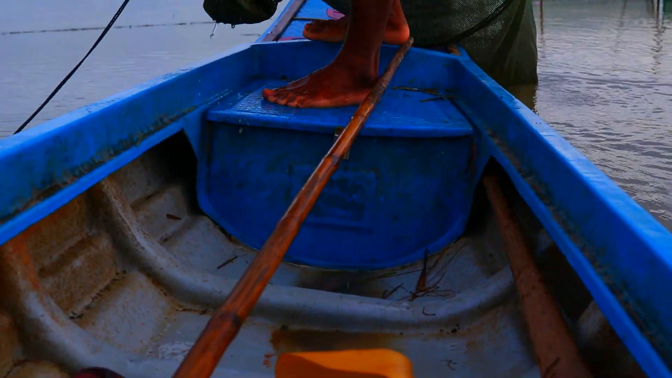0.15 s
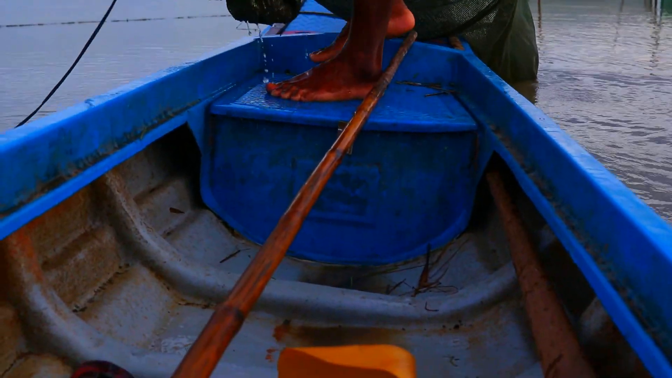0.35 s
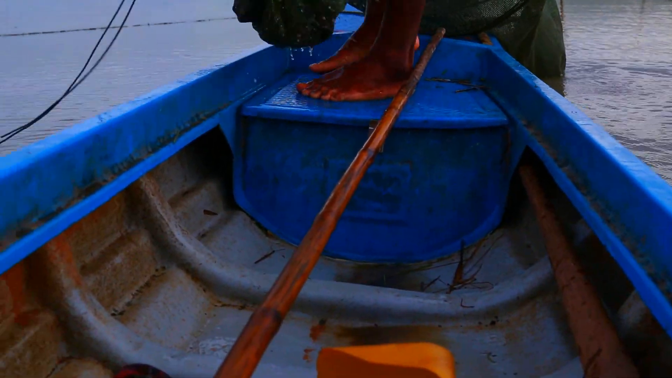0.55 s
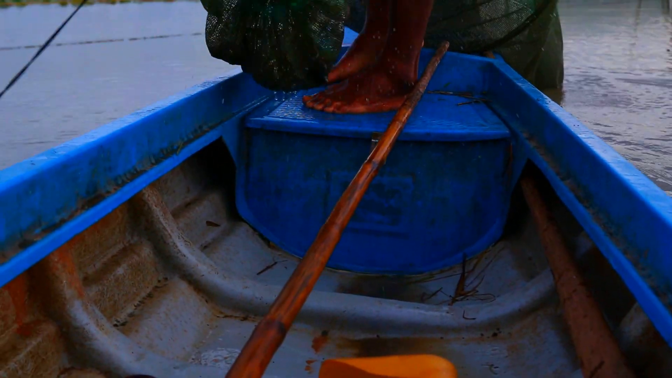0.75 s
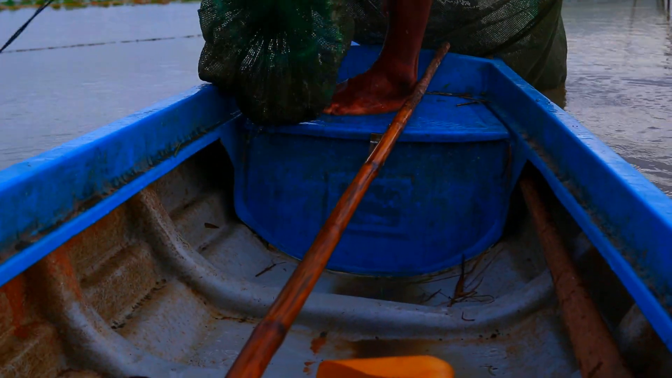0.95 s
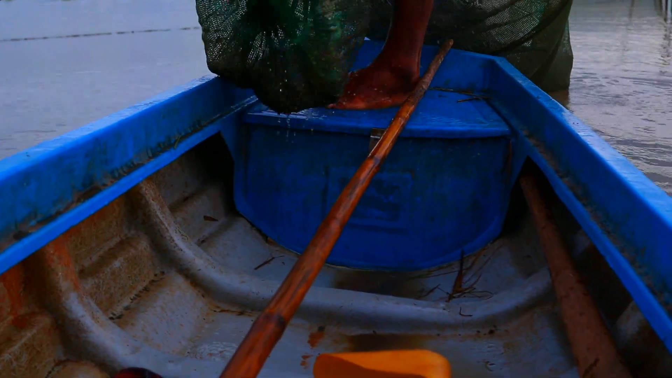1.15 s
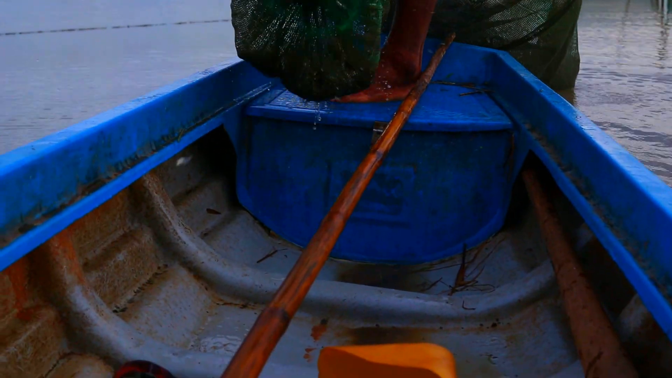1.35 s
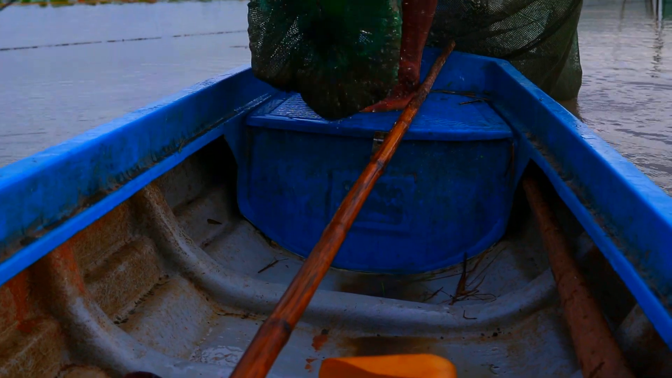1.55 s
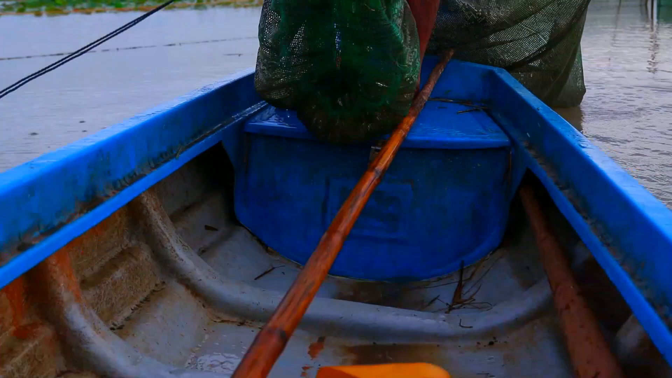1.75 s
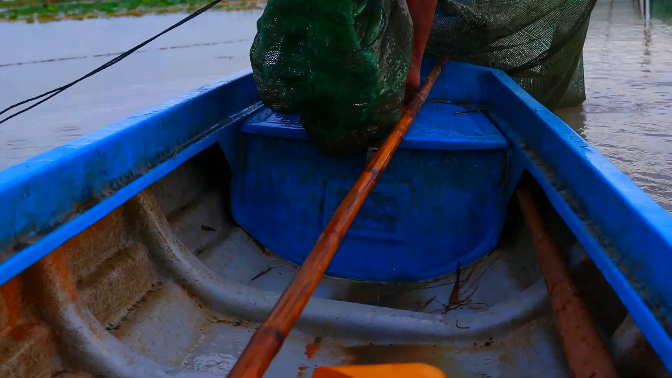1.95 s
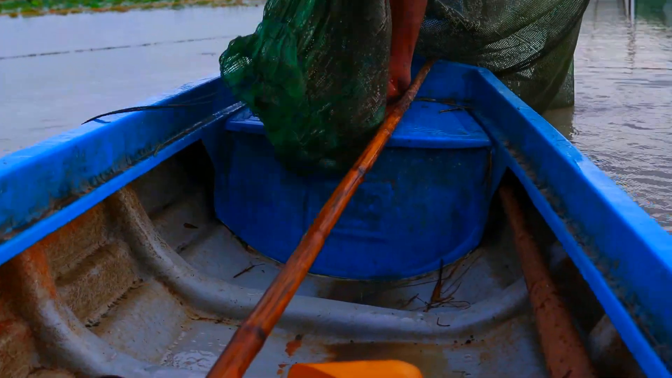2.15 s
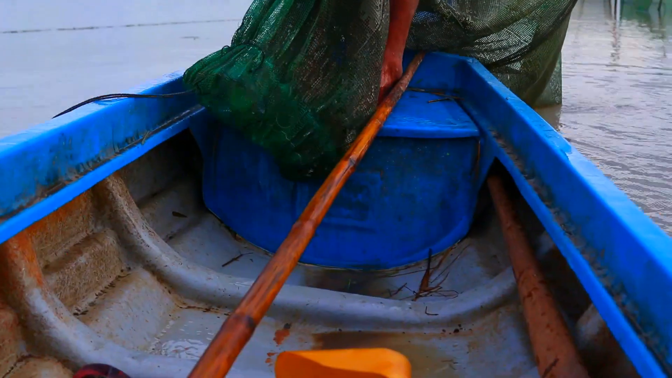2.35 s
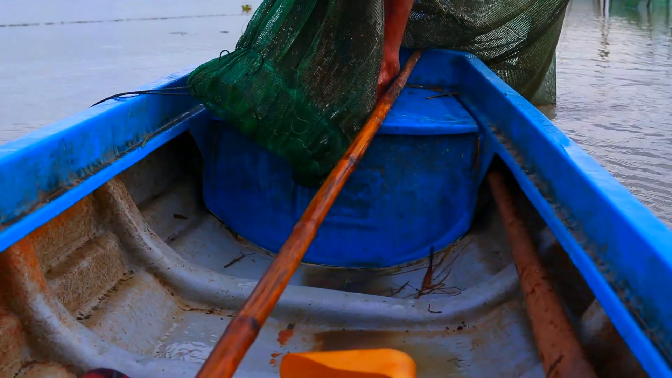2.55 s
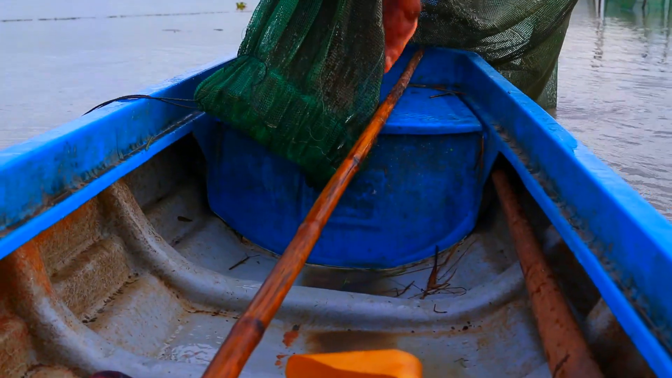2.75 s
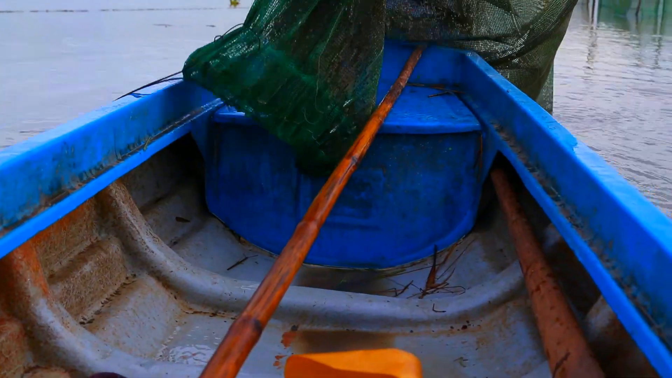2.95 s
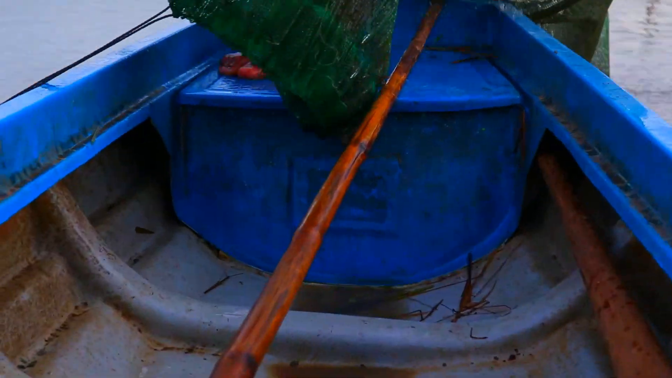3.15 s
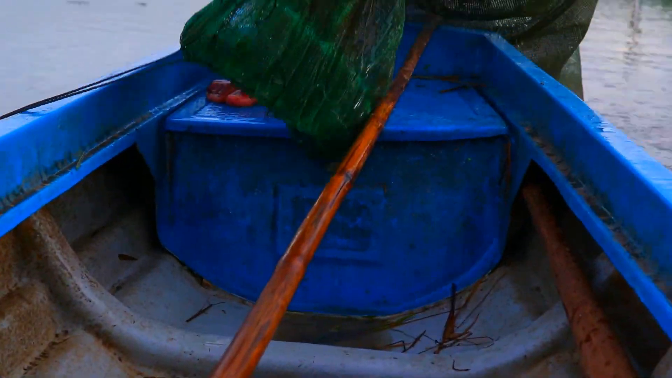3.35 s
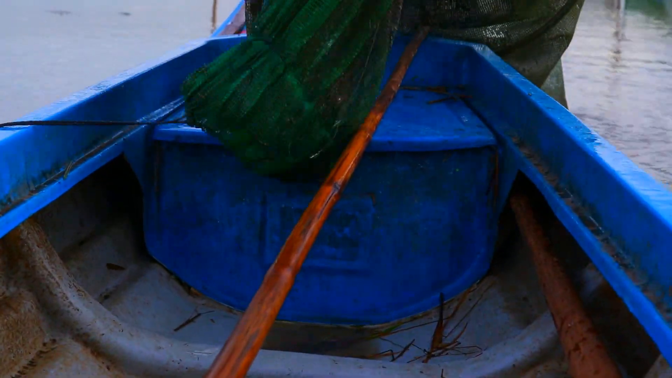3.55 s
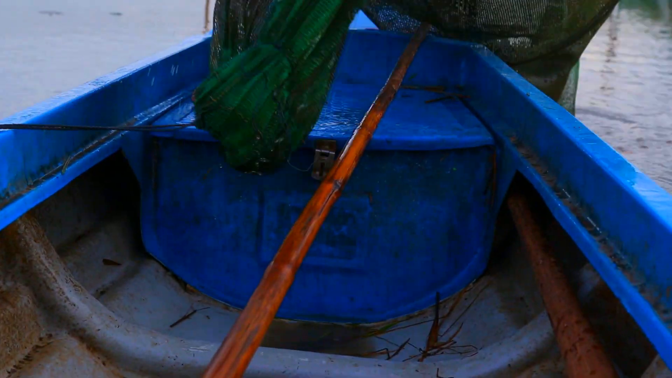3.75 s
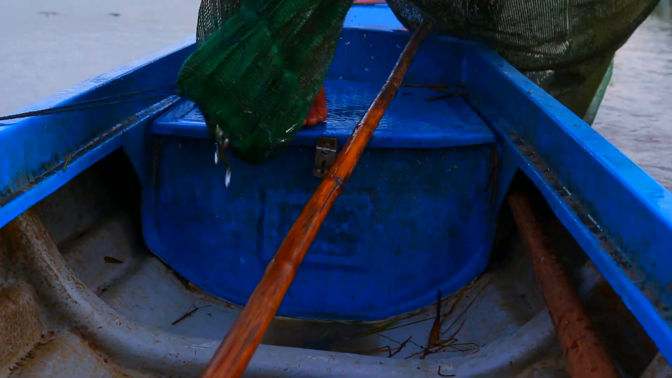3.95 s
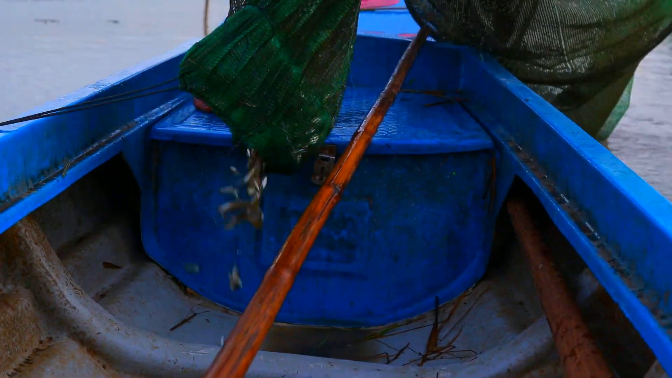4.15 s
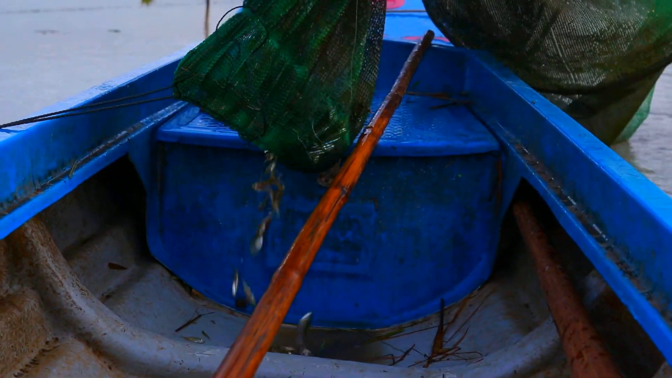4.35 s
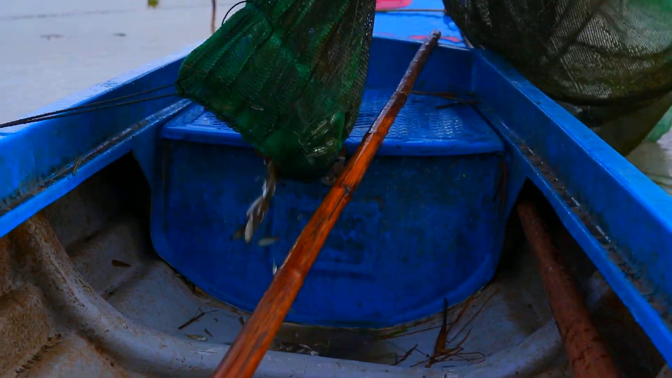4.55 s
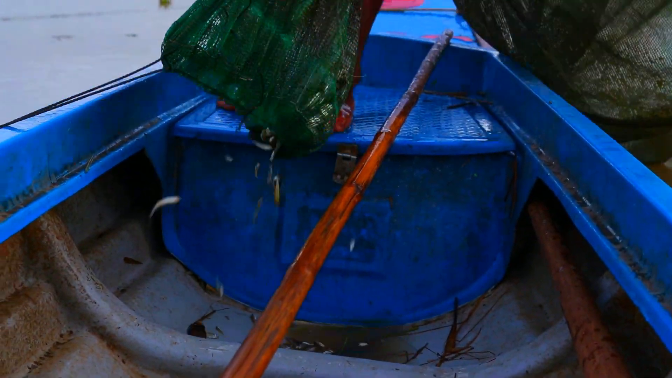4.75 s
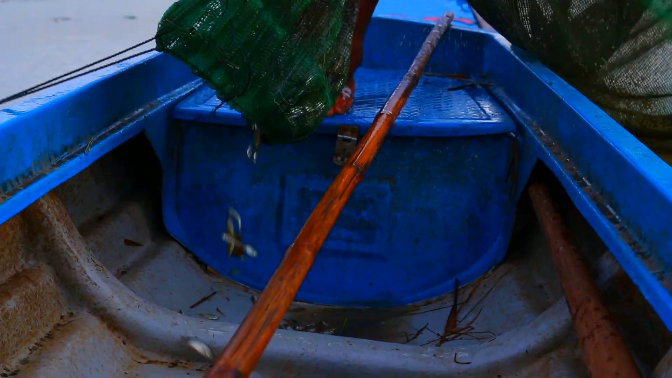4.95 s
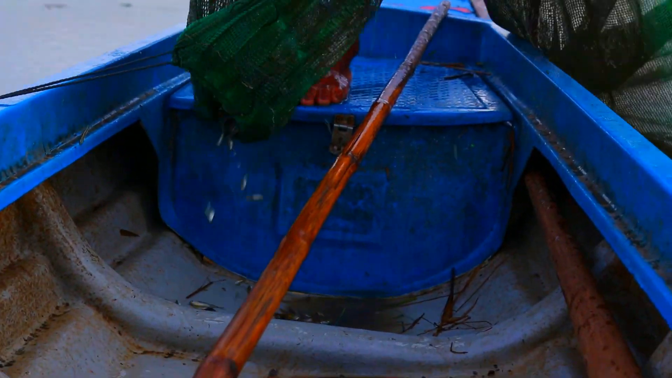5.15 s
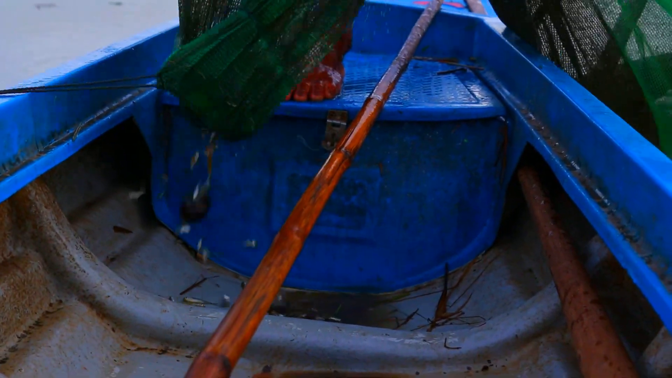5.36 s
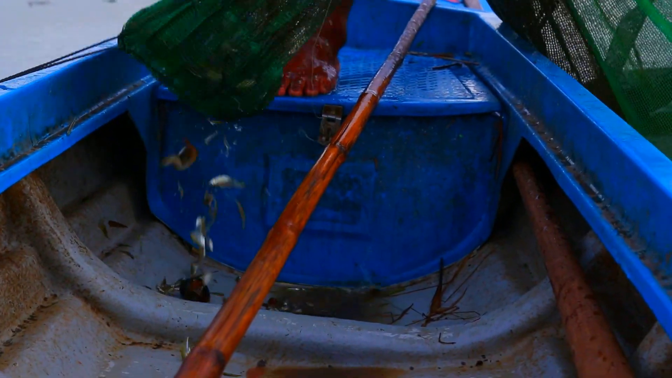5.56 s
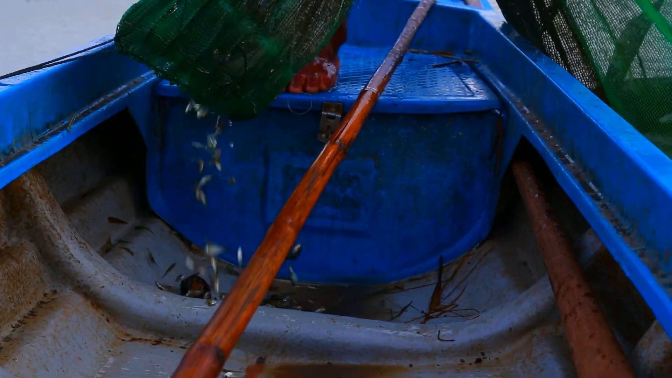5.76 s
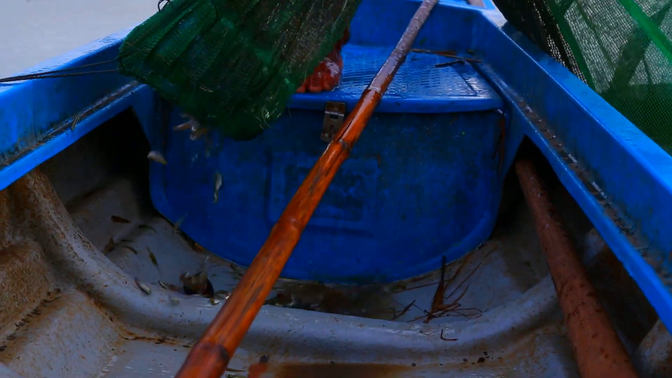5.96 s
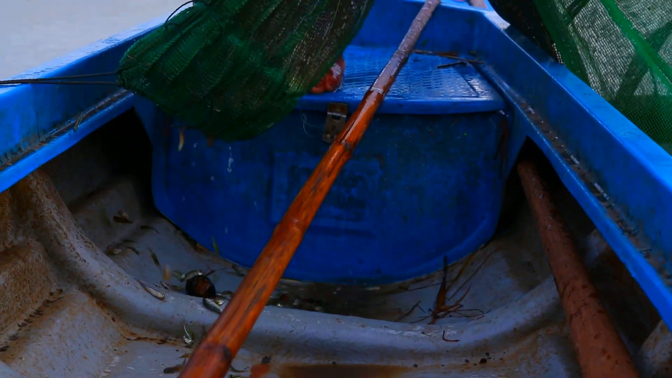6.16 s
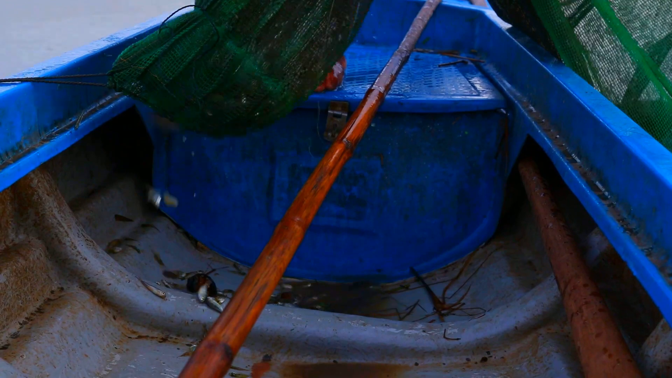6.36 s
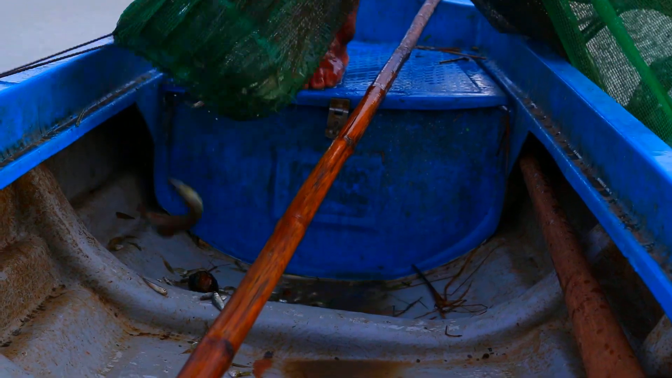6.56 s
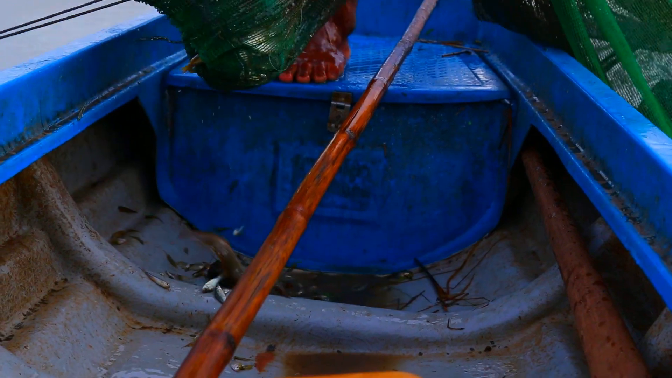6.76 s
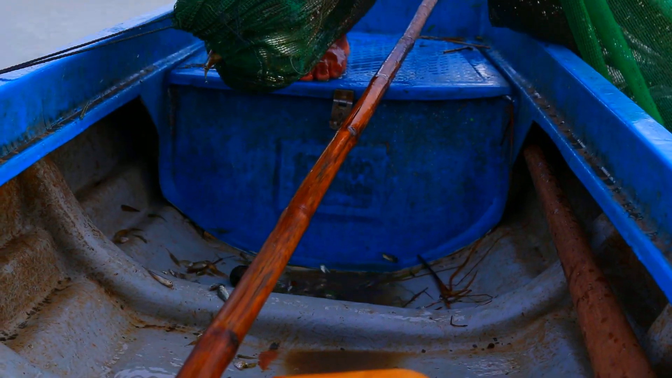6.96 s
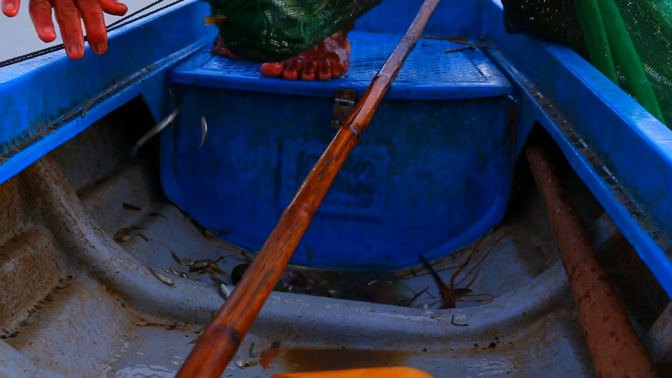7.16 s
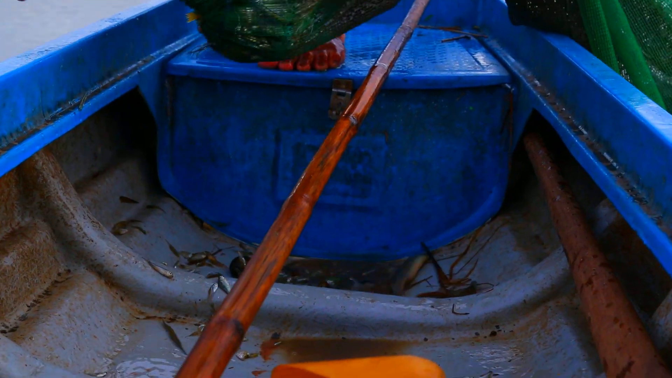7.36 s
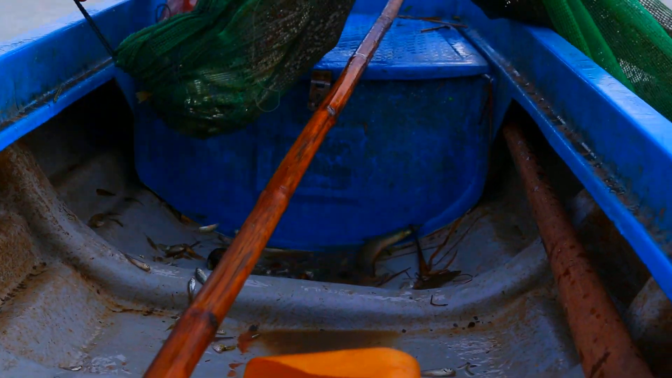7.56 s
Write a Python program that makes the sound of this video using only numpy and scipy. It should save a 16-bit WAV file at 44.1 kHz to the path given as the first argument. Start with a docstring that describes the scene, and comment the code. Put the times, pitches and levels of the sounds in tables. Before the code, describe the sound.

Outdoors on calm water, heard close up in a small hollow plastic boat, over a very faint far rumble, water hiss and a brief thin insect buzz early on. At first a wet net drips quietly; around 0.5-0.9 s it swishes in with small knocks and a cluster of plinking drops. A sharper knock and spray come near 1.4 s, lighter taps and rustles around 2-2.9 s. From 3.0 to 3.8 s the mesh scrapes over the deck edge in short strokes. From 4 s shaking brings rustling bursts, trickles and flung drops, with a crisp knock at 4.5 s. The loudest hollow clacks land at about 4.85, 5.1, 5.5 and 5.65 s, the last in a tight flurry with wet spray. After 6 s only small taps, soft rustles and drips remain, while a distant bird repeats a falling whistle from 6.5 to 7.4 s.

```python
"""A small plastic boat on open water: a wet net bag is swung in and shaken empty. Shells and small fish knock
and splat on the hull (noise contacts ringing wall and panel modes), the mesh rustles, sheds water (shaped noise
and bubble grains) and drags over the deck edge, and drops plink into puddles (decaying tones). Behind lie a far
rumble, water hiss and an insect (coloured noise) and two birds (gliding sines)."""
import sys
import numpy as np
from scipy import signal
from scipy.fft import rfft, irfft, next_fast_len
from scipy.io import wavfile
from scipy.ndimage import uniform_filter1d, map_coordinates

SR = 44100
rng = np.random.default_rng(int(sys.argv[2]) if len(sys.argv) > 2 else 0)


def master_out(mix):
    """Clip the mix to full scale and print it as 16-bit PCM to the path in sys.argv[1]."""
    frames = np.transpose(np.atleast_2d(mix))
    ceiling = np.clip(frames, -1, 1)
    pcm = np.round(ceiling * 32767).astype(np.int16)
    wavfile.write(sys.argv[1], SR, pcm)


N = 335601

# spectrum of splash and spray, relative: (frequency [Hz], density [dB per Hz])
SPLASH_SPECTRUM = [(2710, -5.5), (4600, -8.5), (5970, -3), (8530, -4), (10100, -5.5), (15000, -15.5),
                   (16400, -57)]
# left-right likeness of wide sounds: (frequency [Hz], correlation [-1..1])
WIDE_LIKENESS = [(25, 0.78), (70, 0.99), (180, 0.96), (550, 0.62), (1650, 0.06), (5000, 0.01)]
# hull wall modes that clack, before stretch and dulling: (frequency [Hz], level [dB], t60 [s])
WALL_MODES = [(710, 0, 0.11), (853, -1.5, 0.23), (1021, 0, 0.22), (1124, 0, 0.18), (1157, -15, 0.086),
              (1414, 2.5, 0.12), (1646, -10, 0.16), (1965, -1, 0.075), (2056, -7, 0.14), (2190, 4, 0.086),
              (2360, 1, 0.11), (2630, 10, 0.063), (2790, -3.5, 0.17), (3310, -8, 0.17), (3156, 9.5, 0.032),
              (3540, 0, 0.12), (4460, 11, 0.015)]


def amp(db):
    """Decibels to amplitude."""
    return 10 ** (np.asarray(db) / 20)


def unit(x):
    """x scaled to rms 1."""
    return x / np.sqrt(np.mean(x ** 2) + 1e-20)


def along(points, hz):
    """Interpolate (Hz, value) points on a log frequency axis."""
    f, v = np.transpose(points)
    return np.interp(np.log(hz + 1), np.log(f + 1), v)


def curves(rows):
    """One value per sample for each column after the time."""
    s, *cols = np.transpose(rows)
    return [np.interp(np.arange(N) / SR, s, c) for c in cols]


def wobble(knots_per_s):
    """A smooth random curve through normally distributed knots."""
    knots = rng.standard_normal(int(N * knots_per_s / SR) + 4)
    return map_coordinates(knots, [np.arange(N) * knots_per_s / SR])


def filtered(x, response):
    """x times a response of frequency."""
    m = next_fast_len(N + SR // 2)
    return irfft(rfft(x, m) * response(np.fft.rfftfreq(m, 1 / SR)), m)[..., :N]


def rush(spectrum, alike, texture=1):
    """Stereo noise of rms 1; the texture shapes it in time before it is coloured."""
    def mid_side_gains(hz):
        turn = np.arccos(np.clip(along(alike, hz), -1, 1)) / 2
        return amp(along(spectrum, hz)) * [np.cos(turn), np.sin(turn)]

    mid, side = filtered(texture * rng.standard_normal((2, N)), mid_side_gains)
    return unit(np.array([mid + side, mid - side]))


def patter(per_second, spread_db, life_s, bed):
    """An envelope of scattered small impacts of uneven size on an even bed."""
    sizes = amp(np.minimum(spread_db * rng.exponential(size=N), 24))
    starts = (rng.random(N) < per_second / SR) * sizes
    return bed + signal.lfilter([1], [1, -np.exp(-1 / (life_s * SR))], starts)


def bursts(times, levels_db, attack_s, t60_s):
    """An envelope that jumps up at each time and dies away."""
    since = np.arange(SR // 3) / SR
    starts = np.bincount(np.round(np.asarray(times) * SR).astype(int), amp(levels_db), N)
    shape = (1 - np.exp(-since / max(attack_s, 1e-4))) * amp(-60 * since / t60_s)
    return np.abs(signal.fftconvolve(starts, shape)[:N])


def patchy(x, depth_db, size):
    """x with patches of random gain, size = (bins of 170 Hz wide, frames of 3 ms long)."""
    z = signal.stft(x, nperseg=256)[2]
    field = uniform_filter1d(rng.standard_normal(z.shape[1:]), size=size[0], axis=0)
    field = uniform_filter1d(field, size=size[1], axis=1)
    return unit(signal.istft(z * amp(depth_db * unit(field)), nperseg=256)[1][:, :N])


def add(out, s, sound):
    """Mix a sound in at time s."""
    part = out[:, round(s * SR):round(s * SR) + sound.shape[-1]]
    part += sound[..., :part.shape[1]]


def bubbles(count, centre_hz, spread_oct, cycles, spread_db):
    """Small wet grains: each a few cycles of rising pitch, with its own pitch, size and place; rms 1."""
    at, pitch, life, size, place = rng.random((count, 5)).T[:, :, None]
    t = np.arange(500) / SR
    hz = centre_hz * 2 ** (spread_oct * (2 * pitch - 1))
    fade = hz * t / (cycles * (1.07 + life))
    tone = np.sin(2 * np.pi * hz * t * (1 + 4 * t))
    wave = amp(-spread_db * np.log(size + 0.00042)) * fade * np.exp(-3 * fade) * tone
    spot = ((at * N).astype(int) + np.arange(500)).ravel()
    pans = np.cos(place * 2.58), np.sin(place * 2.3)
    return unit(np.array([np.bincount(spot, (wave * g).ravel(), N + 500)[:N] for g in pans]))


def ring(modes, t, stretch, tilt_db, apart, scatter, count):
    """A stereo pair of dying modes, peak 1: each mode is a cluster of close partials at new strengths.

    apart: left-right phase scatter [turns]; scatter: relative detuning; count: partials per mode."""
    dulling = .4  # partials above 1 kHz die sooner, by this power of their pitch
    hz, db, t60_s = np.repeat(np.transpose(modes), count, axis=1)[:, :, None]
    hz = hz * (1 + scatter * rng.standard_normal(hz.shape))
    phase = rng.random(hz.shape) + apart * rng.standard_normal((2, *hz.shape))
    level_db = db + tilt_db(hz) + 2.84 * rng.standard_normal(hz.shape)
    decay_db = -60 * t * np.maximum(hz / 1000, 1) ** dulling / (t60_s * stretch)
    pair = np.sum(amp(level_db + decay_db) * np.sin(2 * np.pi * (hz * t + phase)), axis=1)
    return pair / np.abs(pair).max()


def distance():
    """A far low rumble with a hum in it, the hiss of open water and an insect's buzz, all coloured noise."""
    # relative spectra: (frequency [Hz], density [dB per Hz])
    rumble_spectrum = [(12, -11), (20, -19.5), (64, 0.5), (103, 2), (192, -5), (370, -16), (445, -13),
                       (543, -27), (600, -17.5), (780, -40), (1320, -120)]
    hiss_spectrum = [(240, -12), (400, -4.5), (870, 0.5), (1210, -40), (3310, -2.5), (4730, -17.5),
                     (6500, -67), (11500, -44), (16000, -58)]
    # insect: (time [s], level [dB])
    insect_level = [(0, -97), (.12, -102), (.42, -67), (.55, -66), (2.5, -109), (2.9, -84), (3.05, -94.5)]
    hum_spectrum = [(70, -74), (84, -19.0), (91, 6.5), (98, 5.5), (115, -32.0)]
    buzz_spectrum = [(3000, -75), (3200, -16), (3320, -0.5), (3440, -4), (3650, -64)]
    rumble_db, hum_db, hiss_db = -49.5, -62.5, -67.5

    rumble = amp(rumble_db + 1.2 * wobble(7)) * rush(rumble_spectrum, WIDE_LIKENESS)
    hum = amp(hum_db) * rush(hum_spectrum, WIDE_LIKENESS)  # narrow band, so it wavers
    hiss = amp(hiss_db) * rush(hiss_spectrum, WIDE_LIKENESS)
    buzz = amp(curves(insect_level)[0]) * rush(buzz_spectrum, [(3300, 0.13)])
    return rumble + hum + hiss + buzz


def bird():
    """Far birds whistle one call that arches and falls: one bird repeats it, and a fainter, higher bird joins
    once at the start; the banks smear it and the air makes it flutter."""
    # whistle shape: (time [s], bend from the top pitch [Hz], level [dB])
    whistle = [(0, -200, -4), (0.025, 0, 5), (.045, -90, 3), (.075, -1200, 2), (.11, -1520, 1),
               (.13, -1600, -30)]
    # calls: (time [s], level [dB], top pitch [Hz], falling tail over the arch [dB]); the faint 5750 Hz call is
    # a second, higher bird
    calls = [(6.525, -63.5, 3850, 0), (6.53, -71, 5750, -40), (6.776, -65, 3980, -1), (7.02, -78, 3800, 15),
             (7.29, -66, 3880, -10)]
    out, t = np.zeros((2, N)), np.arange(round(whistle[-1][0] * SR)) / SR
    s, bend_hz, shape_db = np.transpose(whistle)
    bend = np.interp(t, s, bend_hz)
    for start, level_db, top_hz, tail_db in calls:
        phase = 2 * np.pi * np.cumsum(top_hz + bend) / SR
        call_db = level_db + np.interp(t, s, shape_db) + tail_db * bend / bend_hz.min()
        add(out, start, amp(call_db) * np.sin(phase))
    echo = amp(-60 * t / .25) * rng.standard_normal((2, len(t)))
    out = out + .4 * signal.fftconvolve(out, echo / np.linalg.norm(echo[0]), axes=1)[:, :N]
    return out * amp(5 * np.array([wobble(90), wobble(90)]))


def plinks():
    """Drops into standing water: short ringing tones whose pitch settles from slightly above."""
    # (time [s], level [dB], pitch [Hz], t60 [s], clipped below)
    drops = [(0.224, -43.5, 828, 0.1), (0.545, -32.5, 664, 0.016), (0.601, -28.5, 1446, 0.02),
             (0.655, -48, 930, 0.1), (0.672, -43, 1590, 0.031), (0.726, -44.5, 760, 0.053),
             (0.785, -39.5, 697, 0.033), (0.858, -46, 707, 0.074), (0.891, -41, 690, 0.044),
             (1.978, -43, 1270, 0.07), (4.096, -39.5, 694, 0.029), (5.263, -33, 630, 0.029)]
    out, t = np.zeros((2, N)), np.arange(SR // 8) / SR
    for s, db, hz, t60_s in drops:
        turns = hz * (t - 0.068 * 0.005 * np.exp(-t / 0.03))
        envelope = amp(db - 60 * t / np.clip(t60_s, .015, .15)) * (1 - np.exp(-t / 0.00092))
        add(out, s, envelope * np.sin(2 * np.pi * turns))
    return out


def drags():
    """Knots of the mesh scrape along the deck edge in quick grains and keep the wall modes singing."""
    # (start [s], stroke length [s], level [dB], brightest pitch [Hz])
    strokes = [(3.013, 0.11, -57.5, 1300), (3.4, 0.24, -56.5, 1820), (3.66, 0.19, -53.5, 1290)]
    out, t = np.zeros((2, N)), np.arange(N) / SR
    for s, length_s, db, bright_hz in strokes:
        walls = ring(WALL_MODES, t[:SR // 9], 0.62, lambda hz: -8 * np.log2(hz / bright_hz) ** 2,
                     apart=0.17, scatter=0.042, count=3)
        n = round(length_s * SR)
        knots = patter(230, spread_db=2.5, life_s=.0015, bed=0.31)[:n] * rng.standard_normal(n)
        stroke = np.minimum(1, np.minimum(t[:n] / 0.01, (length_s - t[:n]) / 0.037))
        add(out, s, amp(db) * unit(signal.fftconvolve(walls, (stroke * knots)[None], axes=1)))
    return out


def net():
    """Wet mesh swishes in and rustles in clumps, water trickles out in bubbly grains, fine drops fizz and tick."""
    # net working and dripping: (time [s], rustle [dB], spray [dB])
    working = [(0.0, -59.5, -68), (0.23, -60.5, -71), (0.51, -66, -59), (0.67, -59, -59),
               (1.31, -61.5, -59), (2.03, -62.5, -70.5), (2.35, -54, -55.5), (2.6, -61.5, -68.5),
               (2.9, -68, -67.5), (3.05, -49.5, -61), (3.43, -62.5, -65), (3.62, -58, -62.5),
               (3.85, -64.5, -63), (4.3, -55, -56), (4.8, -61, -57.5), (5.06, -56, -60), (5.52, -55, -60.5),
               (5.69, -47, -50.5), (5.9, -53, -49), (6.52, -62.5, -61.5), (6.92, -57, -63),
               (7.6, -65.5, -63.5)]
    # tugs, each a burst of both: (time [s], rustle [dB], spray [dB])
    tugs = [(0.571, -52, -49), (1.424, -52, -41.5), (1.571, -55, -56), (1.652, -60, -45), (2.175, -51, -58),
            (2.496, -43, -62), (2.873, -50, -53), (3.503, -45, -49.5), (3.554, -43.5, -70),
            (3.794, -44.5, -48), (4, -49, -43.5), (4.356, -38.5, -40), (4.741, -52, -45.5),
            (5.262, -47, -46), (5.491, -39.5, -46.5), (5.617, -36.5, -45), (5.729, -41, -64),
            (5.898, -69, -42.5), (6.104, -44.5, -44), (6.506, -45, -45.5), (7.161, -48, -49),
            (7.483, -50, -61)]
    # handfuls of drops flung on the deck: (time [s], level [dB])
    flicks = [(0.898, -53), (1.229, -53), (1.313, -58), (1.342, -43.5), (1.401, -45), (1.624, -47),
              (1.746, -47.5), (2.327, -49), (2.833, -62), (3.178, -48.5), (3.204, -58), (3.832, -51),
              (3.971, -45.5), (4.042, -42.5), (4.119, -42), (4.287, -44), (4.308, -46), (4.47, -37),
              (4.571, -43), (4.777, -41.5), (5.079, -47), (5.586, -42), (5.705, -40), (5.961, -41),
              (6.319, -44.5), (6.884, -57), (6.917, -52), (7.315, -45), (7.447, -45.5), (7.527, -51)]
    # relative: (frequency [Hz], density [dB per Hz])
    rustle_spectrum = [(300, -30), (450, -6), (700, -6), (1050, -2), (2100, -3), (3000, -8), (3700, -17),
                       (4500, -33), (6500, -90)]
    # the bag swings in: (time [s], half length to -6 dB [s], level [dB], pitch [Hz])
    swing = (.5, .05, -58, 2850)
    tug_attack_s, tug_t60_s = 0.0026, 0.18
    flick_attack_s, flick_t60_s = 0.00035, 0.052

    rustle_db, spray_db = curves(working)
    s, tug_db, shed_db = np.transpose(tugs)
    tugging = bursts(s, tug_db, tug_attack_s, tug_t60_s)
    shedding = bursts(s, shed_db, tug_attack_s, tug_t60_s)
    flicking = bursts(*np.transpose(flicks), flick_attack_s, flick_t60_s)
    rustling = np.hypot(amp(rustle_db + 1.6 * wobble(21)), tugging)
    spraying = np.hypot(amp(spray_db + 2.2 * wobble(22)), shedding)
    spraying = np.hypot(spraying, flicking)

    rustle = rush(rustle_spectrum, [(400, 1.0), (1500, 0.089), (3000, 0.32)],
                  patter(200, spread_db=1.5, life_s=0.00053, bed=1.0))
    trickle = bubbles(count=7000, centre_hz=1552, spread_oct=0.947, cycles=5.9, spread_db=0)
    crackle = bubbles(count=1800, centre_hz=2200, spread_oct=1.1, cycles=3.5, spread_db=2.2)
    spray = rush(SPLASH_SPECTRUM, [(5000, 0.12)], patter(700, spread_db=3.2, life_s=0.0012, bed=.9))
    fizz = bubbles(count=2500, centre_hz=8000, spread_oct=0.7, cycles=25, spread_db=3)
    wet = patchy(rustle + amp(-10.0) * trickle + amp(-7) * crackle, depth_db=4.5, size=(5, 9))
    fine = patchy(spray + amp(-16) * fizz, depth_db=0.5, size=(24, 3))

    s, half_s, db, hz = swing
    swish_level = amp(db - 6 * ((np.arange(N) / SR - s) / half_s) ** 2)
    swish = swish_level * rush([(hz / 2, -40), (hz, 0), (hz * 2, -60)], WIDE_LIKENESS)
    return rustling * wet + spraying * fine + swish


def blows():
    """Ragged contacts ring the walls near their own pitch, throw a short splash and make the big panels boom."""
    # (time [s], clack peak [dB], brightest pitch [Hz], boom re clack before its +12 [dB],
    #  splash re clack [dB], contact t60 [s], clipped below)
    hits = [(0.542, -34.5, 734, -40, -39, 0.016), (0.601, -38, 1420, -47, -12, 0.034),
            (0.69, -41.5, 1030, -12, -2.5, 0.035), (0.76, -43.5, 1900, -11.5, -22, 0.029),
            (0.82, -50, 800, -14, -22, 0.05), (0.867, -45.5, 2200, -13.5, -21, 0.04),
            (1.36, -46.5, 1520, -35, -17, 0.13), (1.569, -38, 2300, -43, -21, 0.026),
            (1.021, -41, 1800, -36, -18, 0.03), (1.032, -43, 1900, -18, -9, 0.035),
            (1.451, -26, 895, -46, -1, 0.016), (1.602, -41, 1670, -41, -5.5, 0.065),
            (1.889, -47, 830, 7.5, -15, 0.0091), (2.028, -33, 905, -19.5, -4, 0.024),
            (2.139, -46.5, 1470, 3.5, -12, 0.081), (2.171, -40.5, 825, -39, -2.5, 0.13),
            (2.223, -45, 980, -6.5, -28, 0.12), (2.36, -38.5, 3300, -16, -27, 0.022),
            (2.907, -37.5, 2080, -16, -12.5, 0.17), (2.949, -47, 2960, -24, 14, 0.02),
            (2.964, -40.5, 2930, -11.5, 3, 0.03), (3.348, -46, 1520, -17, 3, 0.045),
            (3.387, -45, 2000, -15, -21, 0.048), (3.436, -45.5, 1480, -14, -26, 0.053),
            (3.586, -39, 2000, -12, -23, 0.059), (3.61, -55, 700, 3.5, -2, 0.087),
            (4.029, -37.5, 1770, -27, -6.5, 0.13), (4.187, -39.5, 1710, -30, -12, 0.23),
            (4.252, -37, 3170, -18.5, -6.5, 0.039), (4.482, -35.5, 2500, -6.5, -16, 0.037),
            (4.487, -21.5, 2800, -19, -17.5, 0.036), (4.638, -31.5, 1540, -48, -19, 0.036),
            (4.849, -11, 1890, -18, -9, 0.054), (4.89, -30.5, 2600, -8.5, -11, 0.057),
            (4.914, -30, 1700, -18, -17, 0.045), (4.975, -30, 1020, -11, -17.5, 0.084),
            (5.1, -13, 1920, -21, -6, 0.072), (5.432, -58, 800, 9.5, -17, 0.06),
            (5.454, -45.5, 2400, 1.5, -5, 0.043), (5.514, -9, 1210, -25, -18.5, 0.06),
            (5.631, -8, 2270, -27.5, -15.5, 0.054), (5.668, -21, 2300, -21, -17, 0.1),
            (5.675, -16.5, 2140, -30, -21, 0.044), (5.761, -45, 900, 0.5, -20, 0.14),
            (5.795, -28.5, 4250, -39, -5.5, 0.052), (5.845, -37, 2020, -29, -4, 0.044),
            (5.863, -37.5, 2130, -20, 6.5, 0.048), (6.044, -41, 740, -14, -3, 0.16),
            (6.137, -45.5, 1340, -9, 3, 0.15), (6.235, -44.5, 2800, -33, -26, 0.052),
            (6.71, -49.5, 1800, 1, 9, 0.07), (6.721, -40.5, 1490, -12, -16, 0.15),
            (6.827, -33, 960, -10, -18, 0.027), (7.04, -39, 3480, -20, -5.5, 0.14),
            (7.082, -39.5, 2660, -30, -8, 0.078), (7.205, -35.5, 1180, -13, -37, 0.068),
            (7.24, -55, 900, 5, -20, 0.03), (7.362, -44, 1330, -26, -14, 0.13)]
    # relative: (frequency [Hz], density [dB per Hz])
    clack_spectrum = [(350, -20), (600, -7.5), (1090, -10), (1250, -4), (4200, -9.5), (5460, -35),
                      (9240, -120)]
    # booming panel modes, before stretch: (frequency [Hz], level [dB], t60 [s])
    panel_modes = [(193.1, -7, 0.79), (220.8, 3, 0.22), (230, -3.5, 0.12), (294.5, -2, 0.26),
                   (315.3, 6.5, 0.3), (352.5, -7.5, 0.81), (403.6, -4, 0.13), (451, 3, 0.21),
                   (504, -7, 0.52), (598, 4, 0.16)]
    # the pile lies to the right: (frequency [Hz], left minus right [dB])
    balance = [(300, -0.5), (1200, -1), (2400, -10), (4500, -0.5), (12000, -3)]
    lead_s = .006  # room for the soft edge ahead of the touch
    full_ring_t60_s, max_stretch = .1, .6  # contact t60 over the first stretches the wall t60s, up to the cap
    slap_db, knock_db, knock_share = -8.0, 0, .17  # knock t60 is this share of the contact's

    out, t = np.zeros((2, N)), np.arange(SR // 5) / SR
    crack = rush(clack_spectrum, [(600, 0.81), (1500, 1.0), (4000, 0.048)])
    splash = rush(SPLASH_SPECTRUM, [(5000, 0.24), (15000, 0.042)])
    after = np.maximum(t - lead_s, 0)
    for s, db, bright_hz, boom_db, splash_db, t60_s in hits:
        t60_s = np.clip(t60_s, .01, .2)
        edge = np.minimum(np.exp((t - lead_s) / (0.012 * t60_s)), 1)  # long contacts also land slowly
        start = rng.integers(N - len(t))
        grain = np.s_[:, start:start + len(t)]

        contact = edge * amp(-60 * after / (0.58 * t60_s)) * rng.standard_normal(len(t))
        contact = contact[None, :SR // 25]
        contact[0, round(lead_s * SR)] += 11  # hard edge of the first touch
        late_s = lead_s + .03 * rng.random(7)
        rattle = 5 * amp(-60 * (late_s - lead_s) / (2.75 * t60_s)) * rng.standard_normal(7)
        contact[0, (late_s * SR).astype(int)] += rattle

        walls = ring(WALL_MODES, t[:SR // 9], min(t60_s / full_ring_t60_s, max_stretch),
                     lambda hz: -5 * np.log2(hz / bright_hz) ** 2, apart=0.15, scatter=0.0287, count=4)
        walls = signal.fftconvolve(walls, contact, axes=1)
        walls = np.pad(walls, ((0, 0), (0, len(t) - walls.shape[1])))
        boom = ring(panel_modes, after, 0.29 + 5 * t60_s, lambda hz: -3 * np.log2(hz / 250),
                    apart=0.036, scatter=0.042, count=2)
        boom = boom * (1 - np.exp(-after / 0.00059))

        slap = amp(slap_db - 60 * after / t60_s) * crack[grain]  # the wet body, without a pitch
        knock_turns = bright_hz * after + 0.12 * rng.standard_normal((2, 1))
        knock = amp(knock_db - 60 * after / (knock_share * t60_s)) * np.sin(2 * np.pi * knock_turns)
        knock = knock * (t >= lead_s)
        splat = amp(splash_db - 60 * after / (0.81 * t60_s)) * splash[grain]
        clack = walls / np.abs(walls).max()
        blow = amp(boom_db + 12.0) * boom + clack + edge * (knock + slap + splat)
        add(out, s - lead_s, amp(db) * blow)

    def lean(hz):
        bass_cut = (1j * hz / (110 + 1j * hz)) ** 2  # the small hull radiates no deep bass
        return amp(along(balance, hz) * [[.5], [-.5]]) * bass_cut

    return filtered(out, lean)


def scene():
    """All layers; net, drags and distance lean 1 dB to the right, blows by their own balance."""
    leaning = (net() + drags() + distance()) * amp([[-.5], [.5]])
    return blows() + leaning + plinks() + bird()


def record(dry):
    """Band limit: nothing at or above 16.5 kHz passes."""
    top_hz = 16500
    return filtered(dry, lambda hz: hz < top_hz)


dry = scene()
out = record(dry)
master_out(out)
```